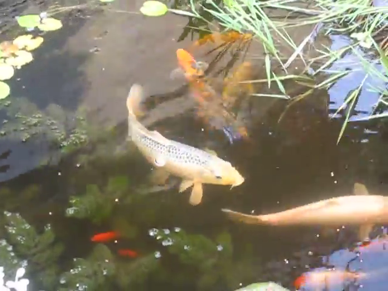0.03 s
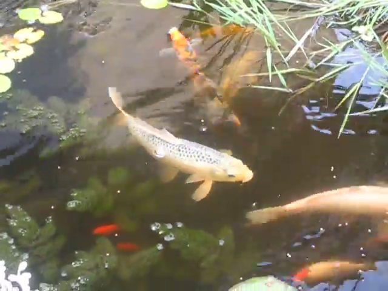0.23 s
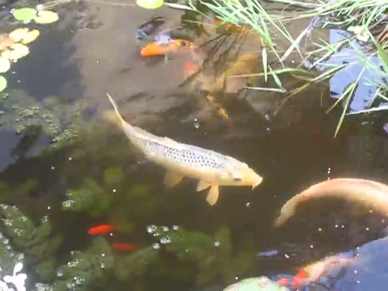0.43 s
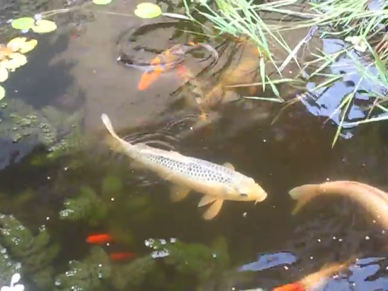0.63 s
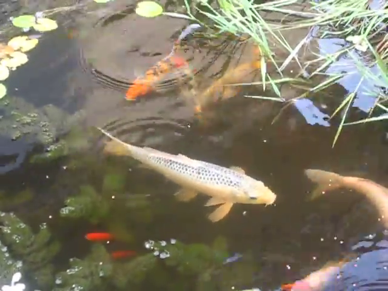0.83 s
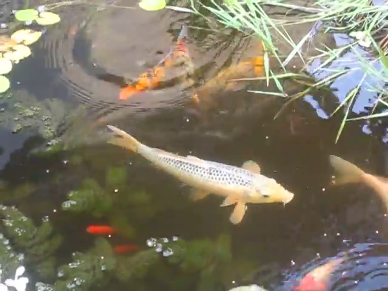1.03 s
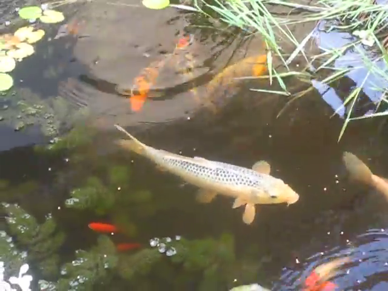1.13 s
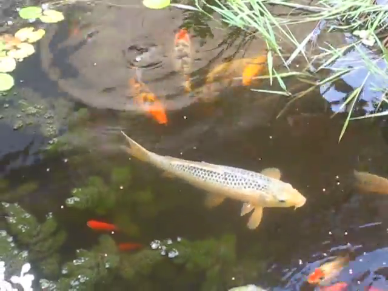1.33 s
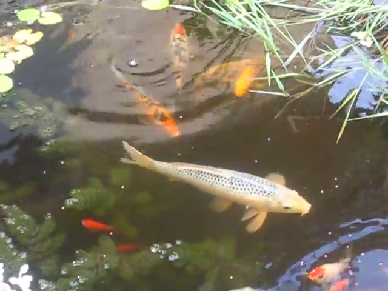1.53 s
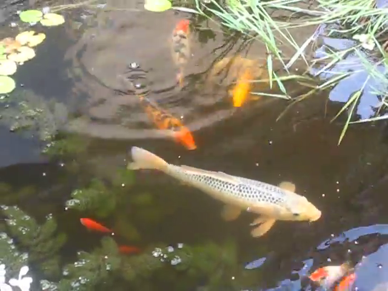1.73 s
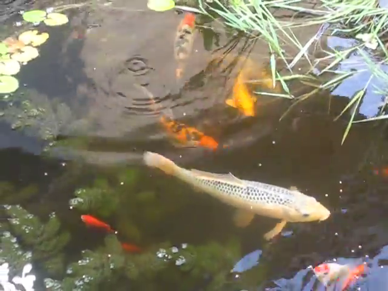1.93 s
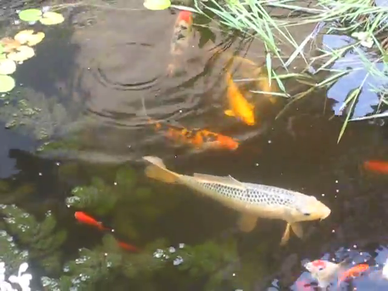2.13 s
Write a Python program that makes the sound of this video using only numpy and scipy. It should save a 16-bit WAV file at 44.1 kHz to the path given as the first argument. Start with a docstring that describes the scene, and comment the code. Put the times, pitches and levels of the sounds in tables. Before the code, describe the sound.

Close by, feeding fish slurp and smack at the water in quick, uneven bursts that finish with the strongest smack. Tiny bubbles plip while a garden pond trickles softly over a faint pump hum and an outdoor wash.

```python
"""Koi feed at the surface of a garden pond. From the start a pump hums, the garden gives a soft wash
of noise, water trickles and single bubbles ring. Then come the gulps, each a fizzing slurp of air and
water; the strong ones end in a sharp smack as the mouth shuts. The loud smacks overload the recorder,
whose gain control turns the sound down and lets it come back. The loudest smack is near the end."""
import sys
import numpy as np
from scipy import signal
from scipy.fft import rfft, irfft
from scipy.io import wavfile

SR = 44100
rng = np.random.default_rng(int(sys.argv[2]) if len(sys.argv) > 2 else 0)


def unload_audio(sound):
    """Save the sound as a 16-bit wav file, at the path given as the first command line argument."""
    columns = np.transpose(np.atleast_2d(sound))
    # keep every value between -1 and 1, then stretch to whole-number steps
    steps = np.round(np.clip(columns, -1, 1) * 32767)
    wavfile.write(sys.argv[1], SR, steps.astype(np.int16))


N = 97020
TIME = np.arange(N) / SR
RING_ONSET_S = 0.0041   # how long a bubble or the mouth takes to start ringing


def from_db(db):
    """Turn decibels into a number to multiply by."""
    return 10 ** (np.asarray(db) / 20)


def coloured(x, spectrum):
    """Shape a sound's lows and highs by (pitch_hz, level_db) points; its average (rms) level becomes 1."""
    points_hz, points_db = np.transpose(spectrum)
    hz = np.arange(N // 2 + 1) * SR / N
    curve_db = np.interp(np.log(hz + 1e-9), np.log(points_hz), points_db)
    # make the filter ring only after each click, never before it (minimum phase)
    cepstrum = irfft(np.log(from_db(curve_db)), N)
    cepstrum[1:N // 2] *= 2
    cepstrum[N // 2 + 1:] = 0
    shaped = irfft(rfft(x) * np.exp(rfft(cepstrum)), N)
    return shaped / np.sqrt(np.mean(shaped ** 2) + 1e-20)


def drift(per_s):
    """A slow random wander, about 1 up or down."""
    return np.interp(TIME * per_s, np.arange(N // 100), rng.standard_normal(N // 100))


def grains(per_s, spread_db):
    """Random clicks of uneven size and sign."""
    sizes = from_db(spread_db * np.minimum(rng.exponential(1, N), 5)) * rng.choice([-1, 1], N)
    return sizes * (rng.random(N) < per_s / SR)


def ring(clicks, hz, fade_s):
    """Each click starts a tone that dies away."""
    decay, angle = from_db(-60 / (fade_s * SR)), 2 * np.pi * hz / SR
    return signal.lfilter([0, np.sin(angle)], [1, -2 * decay * np.cos(angle), decay ** 2], clicks + 1e-18)


def fade(t, fade_s):
    """A level that drops by 60 dB every fade_s seconds."""
    return np.exp(-np.log(1000) * t / fade_s)


def soft_ring(t, hz, fade_s):
    """A tone that starts smoothly and dies away."""
    return (1 - fade(t, RING_ONSET_S)) * fade(t, fade_s) * np.sin(2 * np.pi * hz * t)


def pop(t, hz, length_s):
    """A few waves that swell and die at once."""
    age = np.log(1000) * t / length_s
    return age * np.exp(1 - age) * np.sin(2 * np.pi * hz * t)


def add(out, start_s, sound):
    """Mix a sound in at the given time."""
    i = int(start_s * SR)
    out[i:i + len(sound)] += sound[:N - i]


def pump():
    """The pond pump hums on two low tones that waver a little."""
    # the tones of the hum: pitch_hz, level_db
    tones = [(122.8, -43), (245.6, -49.5)]
    waver_db, waver_radians, waver_per_s = 2, 0.36, 9.05
    hum = 0
    for hz, db in tones:
        height = np.sqrt(2) * from_db(db + waver_db * drift(waver_per_s))
        hum += height * np.sin(2 * np.pi * hz * TIME + waver_radians * drift(waver_per_s))
    return hum


def garden():
    """The garden gives a steady, soft wash of noise."""
    # the lows and highs of the wash: pitch_hz, level_db
    colour = [(20, -62), (45, -11), (100, -13.5), (170, -7), (260, -6.5), (500, -6.5), (950, -3),
              (1400, -9), (2000, -16), (2700, -15.5), (3600, -28), (5000, -19), (6500, -33), (7900, -31.5),
              (9200, -38.5), (11000, -39), (15500, -45)]
    return from_db(-36.5) * coloured(rng.standard_normal(N), colour)


def trickle():
    """Water runs farther off: many small bubbles ring, and the high ones die soonest."""
    # the lows and highs of the running water: pitch_hz, level_db
    colour = [(700, -4.5), (1100, 0.5), (2500, 1), (4400, 4), (6500, -2.5), (7900, -16), (9300, -11.5),
              (11000, -19), (14000, -26)]
    pitches_hz, ring_cycles = np.geomspace(800, 11000, 48), 37
    clicks = grains(per_s=1500, spread_db=3.5)
    pitch_choice = (rng.random(N) * len(pitches_hz)).astype(int)
    bubbles = sum(ring(clicks * (pitch_choice == k), hz, ring_cycles / hz) * np.sqrt(hz)
                  for k, hz in enumerate(pitches_hz))
    return from_db(-41) * coloured(bubbles, colour)


def plips():
    """Single bubbles ring briefly, each at its own pitch."""
    # the clearest bubbles: start_s, level_db, pitch_hz, fade_s
    bubbles = [(.013, -24.5, 2840, .025), (.175, -22, 1030, 0.057), (0.283, -22, 2890, 0.025),
               (.291, -24.5, 1030, 0.058), (0.385, -20.5, 6000, .011), (.654, -21, 3660, 0.012),
               (1.024, -15, 4350, 0.011), (1.495, -19, 1090, 0.047), (1.606, -27, 4080, 0.04),
               (1.653, -25, 4260, 0.027), (1.943, -17, 4200, 0.088), (2.146, -31, 2850, 0.05),
               (2.183, -26.5, 4030, 0.019)]
    out, t = np.zeros(N), TIME[:SR // 10]
    for start_s, db, hz, fade_s in bubbles:
        add(out, start_s, from_db(db) * soft_ring(t, hz, fade_s))
    return out


def slurps():
    """Many tiny bursts of air and water make the mouth ring; each slurp swells, holds and stops."""
    # the gulps: start_s, end_s, level_db, rise_s, fall_s, upper_db, treble_db
    # (rise_s and fall_s are per 10 dB, before the start and after the end)
    gulps = [(0.103, 0.097, -30, 0.01, 0.015, 10, -13), (0.221, 0.238, -28.5, 0.0093, 0.017, 7, -6),
             (0.272, 0.277, -34, .02, 0.012, -10, 0), (0.332, 0.39, -33, 0.024, 0.025, 0.5, -4.5),
             (.582, 0.618, -15, 0.0089, 0.0091, -6, -1.5), (0.675, 0.701, -31, 0.008, 0.023, 6.5, -1),
             (0.86, .878, -27.5, 0.044, 0.0072, -4, -1.5), (0.883, 0.919, -15.5, 0.01, 0.0072, -7, 2.5),
             (1.15, 1.156, -21, 0.004, 0.0031, -1.5, 1.5), (1.173, 1.237, -26, 0.062, 0.019, -2, -1.5),
             (1.322, 1.414, -28.5, 0.038, 0.018, -0.5, -1.5), (1.685, 1.701, -15.5, 0.012, 0.0017, -5, 7),
             (1.715, 1.813, -20, 0.0037, 0.032, 0.5, 0), (1.89, 1.892, -18, 0.02, 0.0093, -2, -10),
             (1.904, 1.915, -19, 0.013, .005, 1.5, 4), (1.914, 1.942, -13.5, .005, 0.009, -1.5, 2.5),
             (1.95, 2.005, -33.5, .01, 0.017, 3.5, 4)]
    # the lows and highs of a slurp: pitch_hz, level_db
    colour = [(150, -43.5), (400, -29.5), (850, -13.5), (1330, -11), (1730, 4.5), (2020, -4), (2400, 1.5),
              (3100, -13.5), (3850, -11), (4250, -9.5), (4750, -9), (5200, -18.5), (6300, -29), (7900, -47),
              (9300, -44.5), (15000, -58)]
    upper_hz, treble_hz = 2200, 3300
    fizz = coloured(grains(per_s=9000, spread_db=2.5), colour)
    highs, treble = [signal.sosfiltfilt(signal.butter(4, hz, "high", fs=SR, output="sos"), fizz)
                     for hz in (upper_hz, treble_hz)]
    bands = [fizz - highs, highs - treble, treble]   # lower, upper, treble
    power = 0
    for start_s, end_s, db, rise_s, fall_s, upper_db, treble_db in gulps:
        before_db = 10 * np.maximum(start_s - TIME, 0) / rise_s
        after_db = 10 * np.maximum(TIME - end_s, 0) / fall_s
        level = from_db(db - before_db - after_db)
        power += np.outer(from_db([0, upper_db, treble_db]), level) ** 2
    return np.sum(np.sqrt(power) * bands, axis=0)


def smacks():
    """The mouth shuts: a pop with a bright snap, a dull thud and a hollow ring."""
    # each closing of the mouth: start_s, level_db, pitch_hz, length_s, snap_hz, snap_db, thud_db, ring_db
    closings = [(0.3241, -17, 1960, 0.0022, 3900, -23, -5, 2),
                (0.6232, 3.5, 1990, 0.0022, 4800, -15.5, -24, -14),
                (.7990, -8, 1910, 0.0028, 4030, -14, -14, 1.5), (0.9286, 3, 1665, 0.0056, 4370, -8, -10, 6),
                (1.1572, -4.5, 1980, 0.0035, 3970, -29, -34, -6),
                (1.4952, -8, 2420, 0.0037, 3650, -1, -9, -16),
                (1.4978, -10, 2000, 0.0023, 3700, -10, -26, 3.5),
                (1.695, 5.5, 2020, .003, 5600, -3, -11, 3.5),
                (1.7930, -9, 1700, 0.0085, 3960, -20, -52, -22),
                (1.8921, -4, 1860, 0.0028, 3920, -6, -26, -25),
                (1.8932, 0.5, 1916, 0.0041, 4200, -11.5, -42, -3),
                (1.9404, 11, 1860, 0.0037, 3010, -1.5, -21.5, 1)]
    # the tones of the hollow mouth: pitch_hz, level_db, fade_s
    mouth_tones = [(1745, -13.5, 0.037), (2610, -23, 0.024)]
    out, t = np.zeros(N), TIME[:SR // 10]
    hollow = sum(from_db(db) * soft_ring(t, hz, fade_s) for hz, db, fade_s in mouth_tones)
    for start_s, db, hz, length_s, snap_hz, snap_db, thud_db, ring_db in closings:
        snap = from_db(snap_db) * pop(t, snap_hz, length_s=0.0014)
        thud = from_db(thud_db) * pop(t, hz=1060, length_s=0.0037)
        smack = pop(t, hz, length_s) + snap + thud + from_db(ring_db) * hollow
        add(out, start_s, from_db(db) * smack)
    # soften the deepest lows and the highest treble
    return signal.sosfilt(signal.butter(2, [378, 6000], "band", fs=SR, output="sos"), out)


def smooth(x, lag_s):
    """Follow a changing value with a short lag."""
    carry = np.exp(-1 / (lag_s * SR))
    return signal.lfilter([1 - carry], [1, -carry], x)


def gain_control(x):
    """The recorder turns itself down just after a loud hit, then steadily comes back up."""
    limit_db, recover_db_per_s = -13.5, 127
    level_db = 10 * np.log10(smooth(x * x, lag_s=0.0039) + 1e-12)
    over_db = np.maximum(level_db - limit_db, 0)
    recovery_db = recover_db_per_s * TIME
    cut_db = np.maximum.accumulate(over_db + recovery_db) - recovery_db
    return x * from_db(-smooth(cut_db, lag_s=0.0021))


def scene():
    """Fish close by, pond and garden behind, in one channel."""
    return (slurps() + smacks() + plips() + trickle() + pump() + garden())[None]


def record(dry):
    """Peaks that slip past the gain control overload; a dip in the treble and both ends are cut away."""
    clip_level, dip_hz, bottom_hz, top_hz = 0.66, 7930, 19, 16200
    x = gain_control(dry[0])
    x = x / (1 + (x / clip_level) ** 6) ** (1 / 6)   # round off the tallest peaks
    x = signal.lfilter(*signal.iirnotch(dip_hz, Q=6.3, fs=SR), x)
    x = signal.lfilter(*signal.butter(1, bottom_hz, "high", fs=SR), x)
    return signal.sosfilt(signal.cheby2(20, 60, top_hz, fs=SR, output="sos"), x)[None]


dry = scene()
out = record(dry)
unload_audio(out)
```